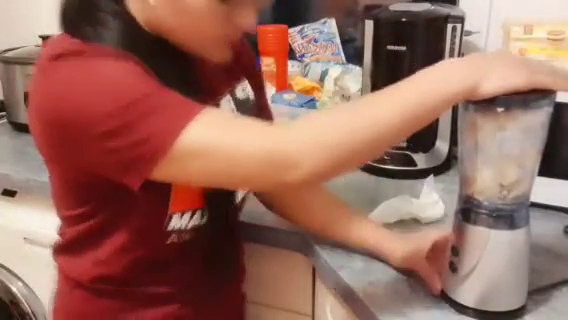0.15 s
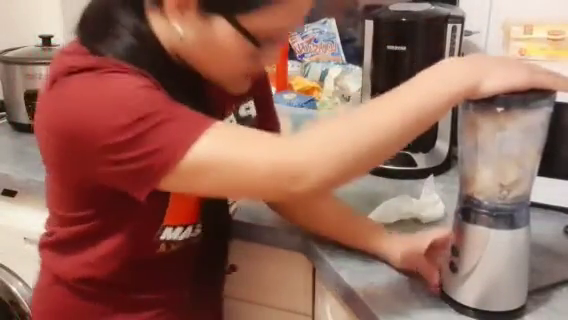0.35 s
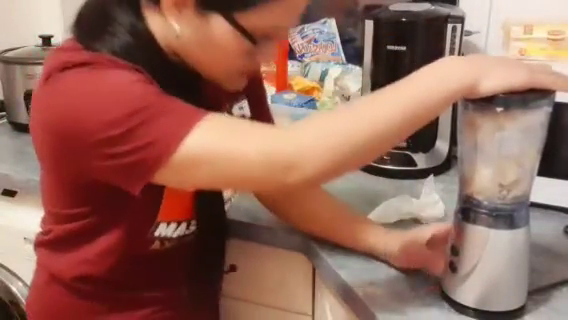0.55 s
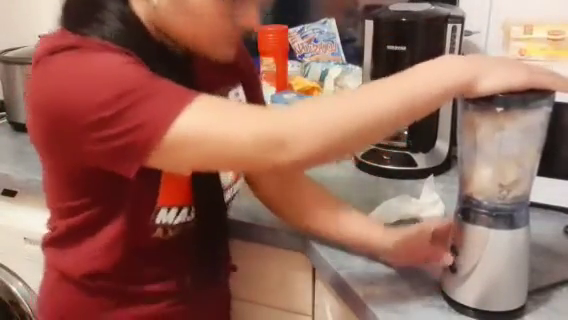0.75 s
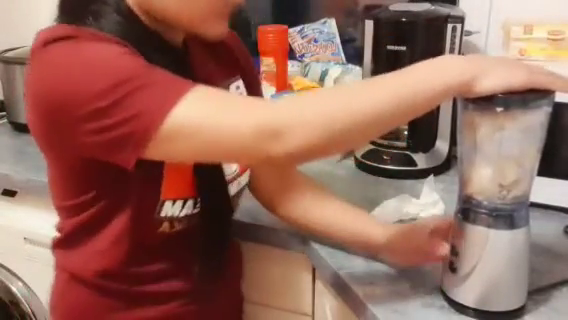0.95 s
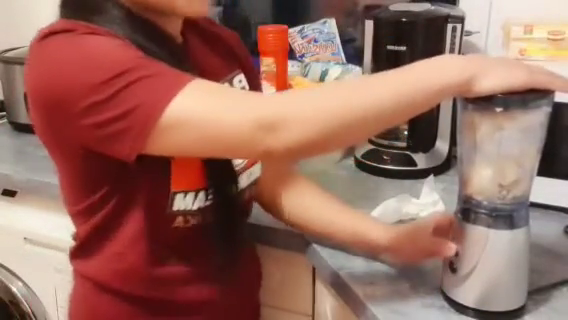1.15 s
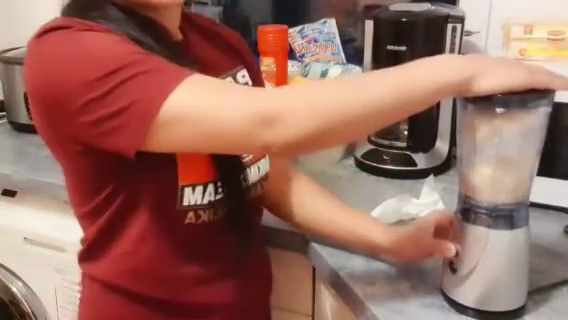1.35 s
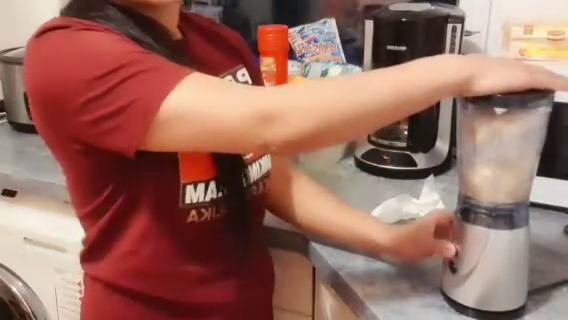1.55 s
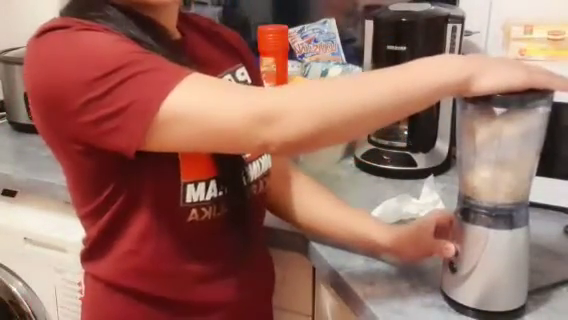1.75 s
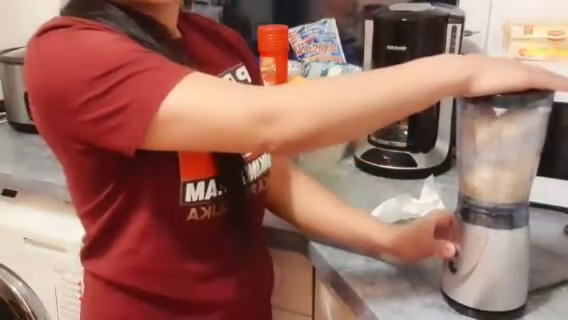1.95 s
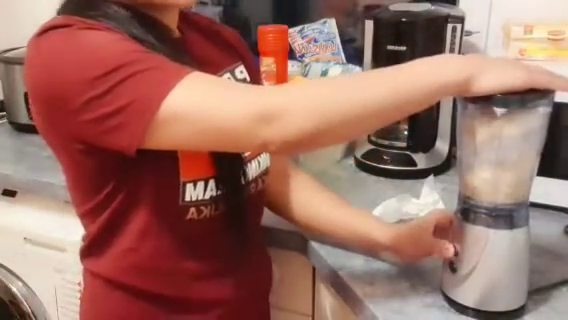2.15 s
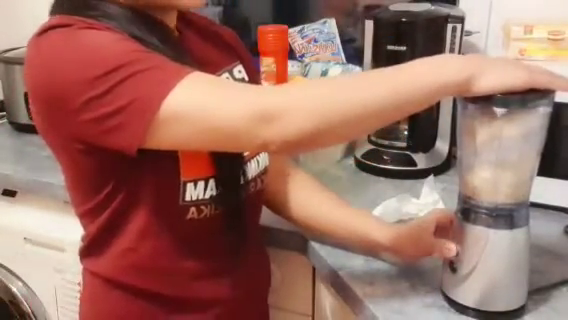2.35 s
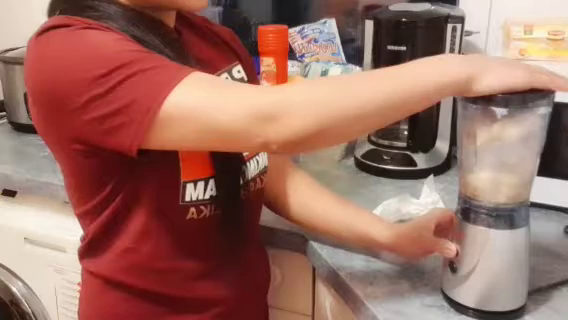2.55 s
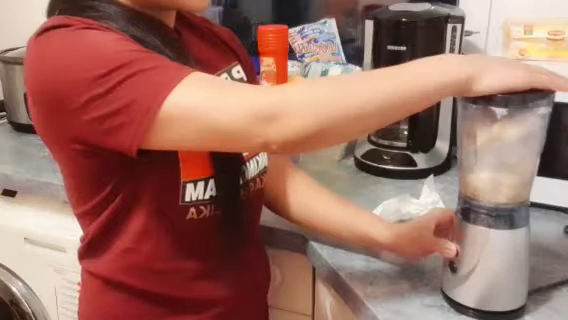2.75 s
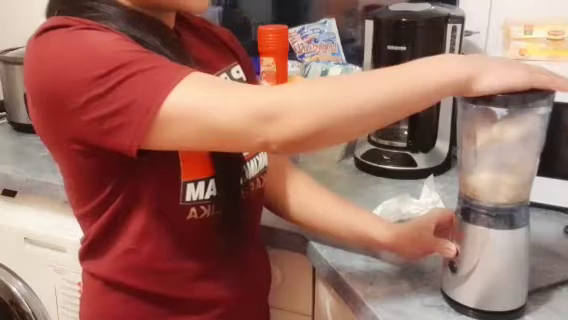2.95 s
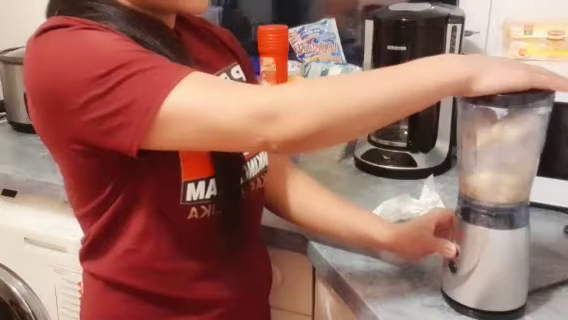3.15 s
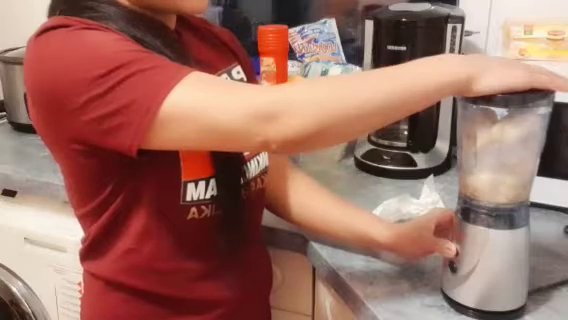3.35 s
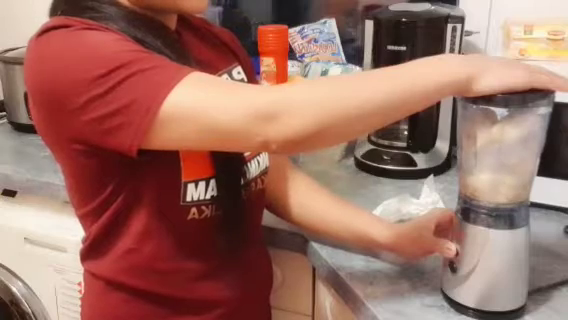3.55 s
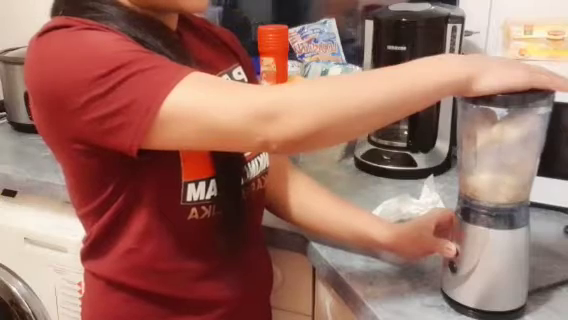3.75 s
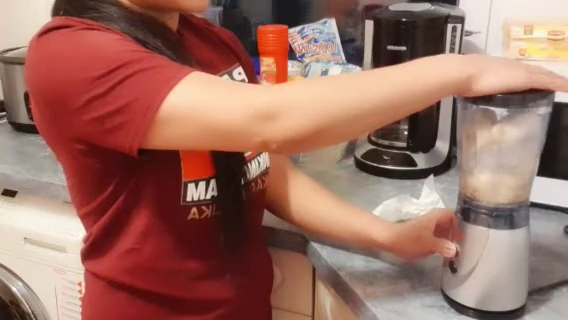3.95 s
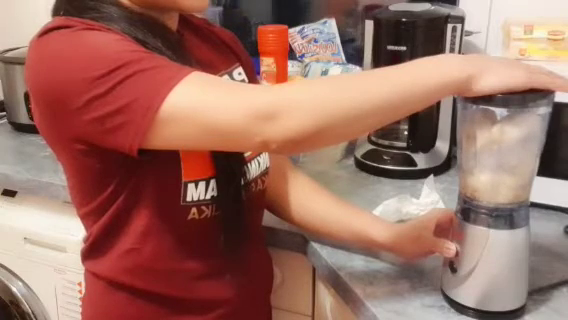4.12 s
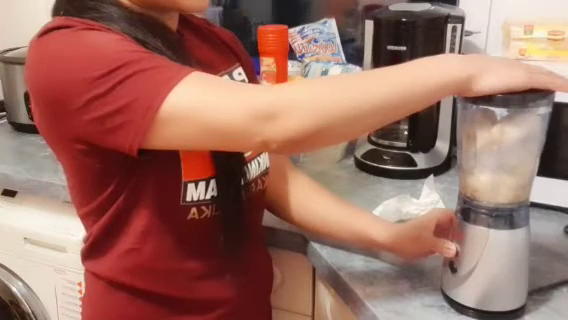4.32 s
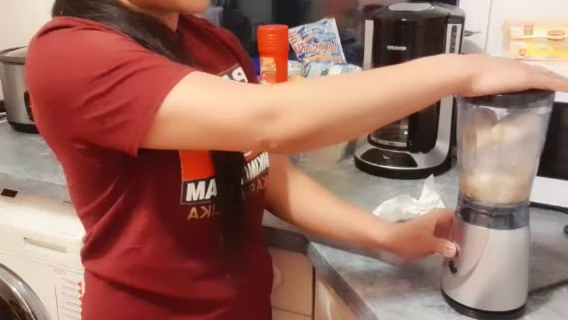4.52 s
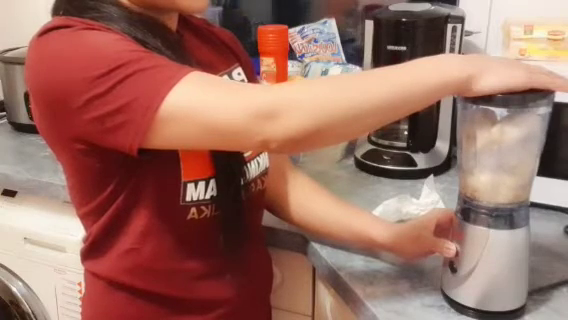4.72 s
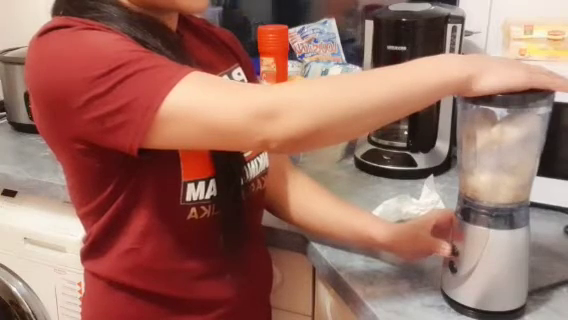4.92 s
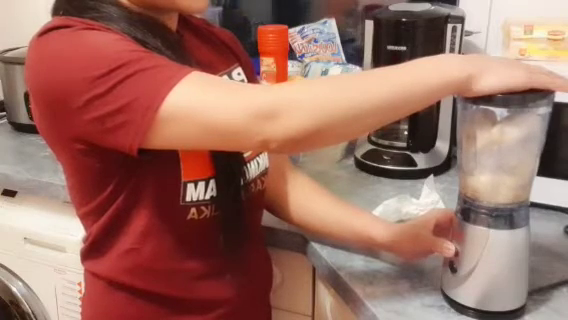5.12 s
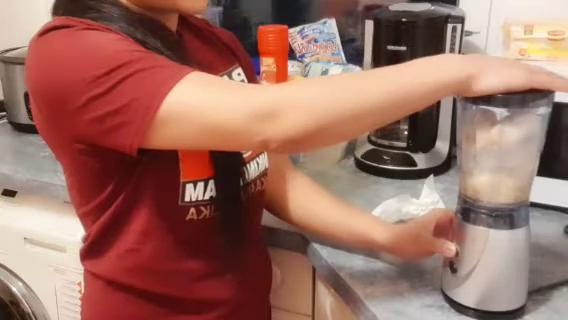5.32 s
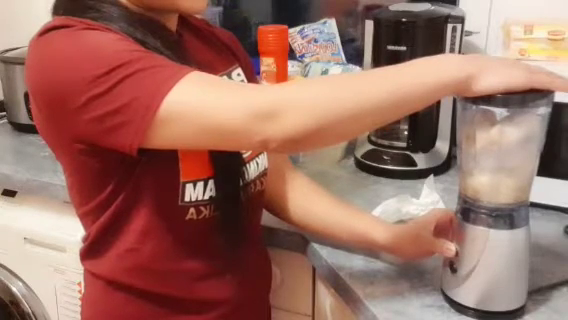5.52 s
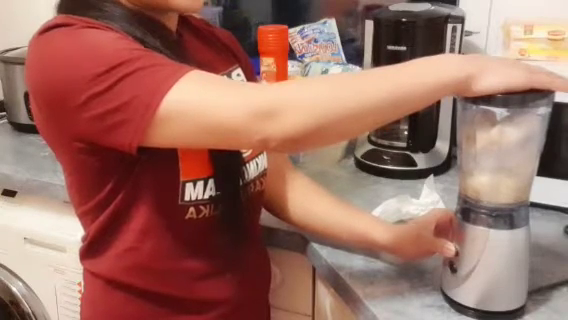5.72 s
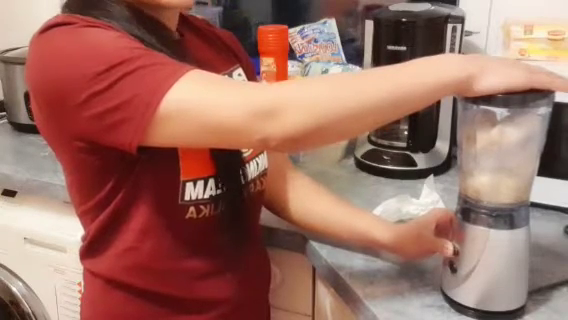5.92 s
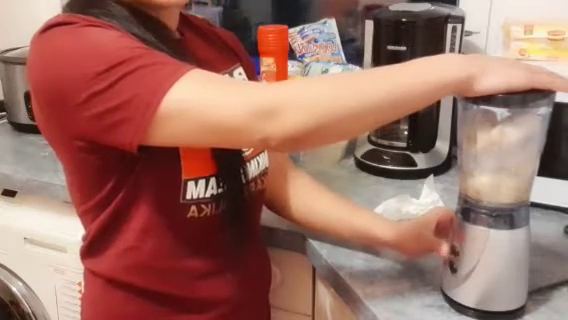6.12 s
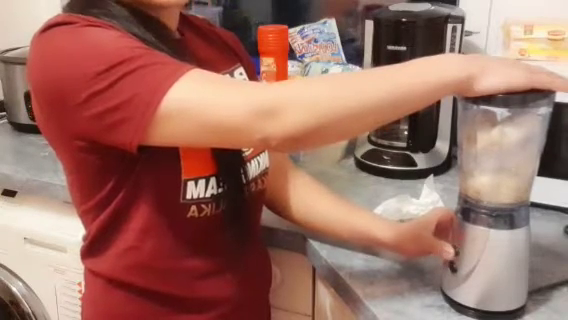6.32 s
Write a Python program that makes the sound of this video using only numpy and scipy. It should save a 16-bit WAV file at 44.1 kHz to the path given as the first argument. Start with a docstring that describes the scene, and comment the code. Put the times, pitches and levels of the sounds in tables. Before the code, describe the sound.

Quiet kitchen with a faint, low wavering hum and barely audible rubs of fingers on a plastic switch. Then a blender crushes ice close by: a short, clattering first pulse, a short gap, a long harsh run with rising motor hum and irregular cracks, then almost at once a brief third pulse. Each coasts down quickly and duller. Small hard room, short dense reverberation, single close microphone, same in both channels.

```python
"""A low wavering hum stands in a quiet kitchen; faint rubs follow, then a blender is pulsed three times.
The rattle is random contacts of ice, coloured as cracks and splinters, shaped by fixed resonances.
Big lumps shatter in short bursts; the unbalanced rotor adds sines at multiples of its turning speed.
The small hard room answers the ice with a dense tail of decaying noise."""
import sys
import numpy as np
from scipy import signal
from scipy.fft import rfft, irfft
from scipy.io import wavfile

SR = 44100
rng = np.random.default_rng(int(sys.argv[2]) if len(sys.argv) > 2 else 0)


def put_to_file(sound):
    """Save the sound as 16-bit audio at rate SR, in the file named by the first command-line argument."""
    columns = np.atleast_2d(sound).T  # one column per channel
    safe = np.clip(columns, -1, 1)
    whole_steps = np.round(safe * 32767)
    wavfile.write(sys.argv[1], SR, whole_steps.astype(np.int16))


N = 281358

# Relative spectral density of ice cracks: pitch_hz [Hz], density_db [dB per Hz]
CRACK_SPECTRUM = [(60, -23.5), (150, -13), (300, -12.5), (600, -6.5), (900, -8.5), (1200, -1.5), (1600, -5),
                  (2300, -2.5), (3100, -6), (5000, -8.5), (9000, -17.5), (16000, -21)]
# Relative spectral density of bright splinters: pitch_hz [Hz], density_db [dB per Hz]
SPLINTER_SPECTRUM = [(1760, -21.5), (3000, -30.5), (3500, -10.5), (3850, 2), (4650, 0.5), (5270, -5),
                     (8050, -2), (8940, -8), (13900, -7), (15800, -18)]
HOLLOW_HZ, HOLLOW_WIDTH_HZ = 1216.6, 71   # loose ice knocks the jug wall
# Whir and counter levels are over the rattle, at a speed of COUNTER_HZ turns per s; widths are per pass.
COUNTER_HZ, COUNTER_DB, COUNTER_DB_PER_OCTAVE = 92, -16.5, -11.5   # booms most while the rotor is slow
BOOM_LAG_S = 0.058   # the counter takes up the shaking a little late
WHIR_HZ, WHIR_WIDTH_HZ, WHIR_DB, WHIR_DB_PER_OCTAVE = 2220, 720, -16.5, 9.5


def ice():
    """Superposition of random impacts: rattle, splinters, hollow wall ring, swept whir and counter boom."""
    gate, rattle_db, splinter_db, hollow_db = rattle_levels()
    octaves = np.log2(rotor_speed()[1] / COUNTER_HZ)
    blows = contacts(6000, spread_db=2.5, clump_db=1.0)
    cracks = coloured(blows, CRACK_SPECTRUM)
    shards = contacts(9500, spread_db=2.0, clump_db=2.5)
    splinters = from_db(splinter_db) * coloured(shards, SPLINTER_SPECTRUM)
    knocks = contacts(900, spread_db=0.5, clump_db=2.5)
    hollow = from_db(hollow_db) * rms_one(resonance(knocks, HOLLOW_HZ, HOLLOW_WIDTH_HZ))

    # crushed ice swept round by the blades, growing with speed
    swept = resonance(rng.standard_normal(N), WHIR_HZ, WHIR_WIDTH_HZ)
    swept = rms_one(resonance(swept, WHIR_HZ, WHIR_WIDTH_HZ))
    whir = from_db(WHIR_DB + WHIR_DB_PER_OCTAVE * octaves + 2.2 * drift(10.6)) * swept

    boom = rms_one(resonance(resonance(blows, COUNTER_HZ, 70), COUNTER_HZ, 64))
    boom_db = COUNTER_DB + COUNTER_DB_PER_OCTAVE * octaves + 4.0 * drift(10)
    taken_up = np.clip(pulses()[1] / BOOM_LAG_S, 0, 1) ** 2
    counter = taken_up * from_db(boom_db) * boom
    return gate * from_db(rattle_db) * (cracks + splinters + hollow + whir + counter)


COAST_POWER = 2.3   # the rattle sinks ever faster while the blades coast
COAST_DULL_DB = 14   # splinters thin out while coasting
JOLT_DB, JOLT_S = 3.5, 0.045   # the starting blades splinter the ice that lies on them
WHOLE_ICE_DB, WHOLE_ICE_S = 4.5, 0.43   # whole cubes splinter brightly in the first pulse, until broken
LOOSE_KNOCK_DB, LOOSE_S = 4, 0.12   # loose ice knocks the wall most just after a start
SURGE_DB, SURGE_HZ, KNOCK_SURGE_DB, KNOCK_SURGE_HZ = .8, 12, 2, 8.7   # the load comes and goes


def rattle_levels():
    """Excitation follows the rotor: gate and levels of rattle, splinters and hollow ring at every sample."""
    gate, since, coasted, which = pulses()
    rattle_db, splinter_db, hollow_db, loss_db = np.transpose(PULSES)[4:8, which]
    rattle_db = rattle_db - loss_db * coasted ** COAST_POWER + SURGE_DB * drift(SURGE_HZ)
    jolt_db = JOLT_DB * np.exp(-since / JOLT_S)
    whole_db = (which == 0) * WHOLE_ICE_DB * np.exp(-since / WHOLE_ICE_S)
    splinter_db = splinter_db + jolt_db + whole_db - COAST_DULL_DB * coasted
    loose_db = LOOSE_KNOCK_DB * np.exp(-since / LOOSE_S)
    hollow_db = hollow_db + loose_db + KNOCK_SURGE_DB * drift(KNOCK_SURGE_HZ)
    return gate, rattle_db, splinter_db, hollow_db


# Pulses of the blender: switch_on_s [s], switch_off_s [s], rest_s [s], rise_s [s],
# rattle_db [dB before the resonances], splinter_db [dB over rattle], hollow_db [dB over rattle],
# coast_loss_db [dB lost by rest], unbalance_db [dB before the base]
PULSES = [(1.259, 1.492, 1.865, 0.035, -23.5, -7, -6.5, 11.5, -42),
          (2.297, 4.92, 5.192, 0.013, -25.5, -8.5, -9.5, 16, -40),
          (5.26, 5.916, 6.229, 0.0094, -25.5, -13, -15.5, 18.5, -38.5)]
SETTLE_S = 0.018   # closing fade just before the blades rest


def pulses():
    """Run-up and coast-down: gate, time since switch-on, share of the coast-down done, pulse number."""
    t = np.arange(N) / SR
    on, off, rest, rise = np.transpose(PULSES)[:4]
    which = np.clip(np.searchsorted(on, t) - 1, 0, None)
    since = t - on[which]
    gate = np.clip(np.minimum(since / rise[which], (rest[which] - t) / SETTLE_S), 0, 1)
    coasted = np.clip((t - off[which]) / (rest - off)[which], 0, 1)
    return gate, np.maximum(since, 0), coasted, which


# Big lumps struck by a blade: start_s [s], peak_db [nominal dB before the resonances],
# splinter_db [dB over cracks]
LUMPS = [(1.2845, -19, 7), (1.318, -3.5, 0), (1.331, -10, -1.5), (1.3713, -4.5, 1.5), (1.3894, -9.5, -1),
         (1.45, -11, -1), (1.488, -3.5, -2.5), (1.656, -7.5, -6), (1.737, -10, -7), (1.8215, -11.5, -5),
         (2.389, -9, -0.5), (2.79, -9, -4), (2.828, -4, -13), (2.9498, -11, -3.5), (3.24, -13, 2),
         (3.441, -10, -3), (3.9494, -15, -1), (4.35, -21, -3), (4.409, -6, -1.5), (4.8053, -13, -5),
         (4.8824, -16.5, 9), (4.925, -9.5, 1), (4.9494, -11, -4), (5.0524, -14, -7), (5.288, -16, -7),
         (5.457, -7.5, -8), (5.479, -5.5, -6.5), (5.65, -11, -4), (5.716, -6, 0), (5.8087, -14.5, 1),
         (5.911, -7, -2.5), (6.034, -20, 3.5)]
SHARD_CREST_DB = 13.5   # nominal peaks of a shattering lump over its rms
SHATTER_RISE_S, LUMP_T60_S = 0.0037, 0.12
LUMP_KNOCK_DB = -12.5   # each lump also knocks the wall


def lumps():
    """Brittle fracture: each struck lump is a burst of cracks that swells quickly and dies exponentially."""
    t, burst, bright = np.arange(N) / SR, np.zeros(N), np.zeros(N)
    for start_s, peak_db, splinter_db in LUMPS:
        rise = np.clip((t - start_s) / SHATTER_RISE_S, 0, 1)
        decay_db = 60 * np.clip(t - start_s, 0, 1) / LUMP_T60_S
        shape = rise * from_db(peak_db - SHARD_CREST_DB - decay_db)
        burst += shape
        bright += from_db(splinter_db) * shape
    shards = contacts(8000, spread_db=1.0, clump_db=1.5)
    wall = rms_one(resonance(burst * shards, HOLLOW_HZ, HOLLOW_WIDTH_HZ))
    knock = from_db(LUMP_KNOCK_DB) * wall * np.std(burst)
    return burst * coloured(shards, CRACK_SPECTRUM) + bright * coloured(shards, SPLINTER_SPECTRUM) + knock


# Fixed resonances of the rattle, from jug, base and room:
# pitch_hz [Hz], width_hz [Hz], lift_db [dB, of this resonance alone]
RESONANCES = [(456, 23, 5), (560, 32, 1.5), (796, 24, 9), (1090, 28, 2), (1170, 26, -4.5), (1449, 53, 5),
              (1688, 40, 4.5), (1790, 49, 2.5), (1994, 14, 3.5), (2156, 15, 7.5), (2295, 44, -1.5),
              (2447, 110, -1.5), (2597, 160, 1.5), (3480, 99, 5.5), (4084, 20, -5), (4446, 91, -6),
              (4463, 110, 6), (5670, 300, 1.5), (6270, 110, 2.5), (6960, 120, 2), (8270, 92, 1)]


def fixed_resonances(x):
    """Resonance: fixed resonances lift or weaken narrow bands of the rattle."""
    for pitch_hz, width_hz, lift_db in RESONANCES:
        x = x + (from_db(lift_db) - 1) * resonance(x, pitch_hz, width_hz)
    return x


# Rotor speed, one table per pulse: time_s [s], speed [turns per s]
SPEED = [
    [(1.45, 88), (1.648, 127), (1.75, 116)],
    [(2.35, 82), (2.56, 171), (2.73, 180), (2.83, 195), (2.88, 185), (3.0, 180), (3.19, 197), (3.43, 198),
     (3.58, 194), (3.73, 200), (3.93, 207.5), (4.05, 200), (4.19, 211), (4.83, 215), (4.88, 204),
     (5.05, 103)],
    [(5.28, 79), (5.39, 112), (5.452, 150), (5.6, 161), (5.758, 174), (5.94, 175), (6.05, 97)],
]


def rotor_speed():
    """Angular motion: a gate open while each speed table lasts, and the turns per second."""
    return in_time(SPEED, .04)


# How the base passes the unbalance on: pitch_hz [Hz], gain_db [dB]
BASE_PASSES = [(85, -1), (105, -1), (130, -7), (158, -11), (166, -2), (190, -2), (215, 1)]
# Higher orders: multiple of the speed [1], level_db [dB rms at top speed, before wavering]
WHINE = [(6, -45), (7, -42.5), (8, -43.5), (11, -47), (12, -48.5)]
TOP_SPEED, WHINE_DB_PER_OCTAVE = 210.6, 61   # turns per s; the whine grows steeply towards it
SECOND_DB, BASE_HZ, BASE_WIDTH_HZ = -41, 418, 80   # the second order shows where it meets a base mode


def rotor():
    """Rotating unbalance: forces once and twice a turn waver with the load; a thin whine joins at speed."""
    gate, speed = rotor_speed()
    turn = 2 * np.pi * np.cumsum(speed * (1 + .004 * drift(20))) / SR
    first_db = np.transpose(PULSES)[8, pulses()[3]] + at_hz(BASE_PASSES, speed)
    stumble_db = 0.6 + 6.1 * np.clip(1 - speed / 165, 0, 1)   # a slow rotor is jolted by the ice
    first = from_db(first_db + stumble_db * drift(18)) * np.sin(turn)
    detuning = 2 * (2 * speed - BASE_HZ) / BASE_WIDTH_HZ
    second_db = SECOND_DB - 20 * np.log10(1 + detuning ** 2)
    second = from_db(second_db + 1.0 * drift(8.2)) * np.sin(2 * turn)
    whine = sum(from_db(db + 1.7 * drift(6)) * np.sin(round(order) * turn) for order, db in WHINE)
    whine = whine * from_db(WHINE_DB_PER_OCTAVE * np.log2(speed / TOP_SPEED))
    return np.sqrt(2) * gate * (first + second + whine)


# Fingers on the switch: start_s [s], level_db [dB rms before the swell],
# pitch_hz [Hz], width_hz [Hz per pass], length_s [s]
HANDLING = [(.86, -92, 1500, 150, .05), (0.917, -85, 794, 150, .06), (.94, -87, 1550, 200, .07),
            (1.04, -85, 2280, 500, .05), (1.153, -76, 1530, 154, 0.29), (2.273, -77.5, 700, 200, 0.02)]


def handling():
    """Friction noise: faint rubs and a creak of plastic, each resonant noise under a half-sine swell."""
    t, out = np.arange(N) / SR, np.zeros(N)
    for start_s, level_db, pitch_hz, width_hz, length_s in HANDLING:
        rub = resonance(rng.standard_normal(N), pitch_hz, width_hz)
        rub = rms_one(resonance(rub, pitch_hz, width_hz))
        swell = np.sin(np.pi * np.clip((t - start_s) / length_s, 0, 1))
        out += from_db(level_db) * rub * swell
    return out


KITCHEN_DB = -4   # reverberation against direct sound


def kitchen(x, count=5):
    """Diffuse reverberation: flying ice is shared among spots that reach the room differently."""
    shares = np.array([drift(10.2) for _ in range(count)])
    shares /= np.sqrt(np.sum(shares ** 2, axis=0))
    wet = sum(signal.fftconvolve(share * x, room_tail())[:N] for share in shares)
    return (x + from_db(KITCHEN_DB) * wet) / np.sqrt(1 + from_db(2 * KITCHEN_DB))


# Reverberation time of the kitchen: pitch_hz [Hz], t60_s [s]
KITCHEN_T60 = [(60, .4), (300, .36), (1200, .36), (6000, .32), (11000, .28), (16000, .23)]


def room_tail():
    """Exponential decay of a diffuse field: dense noise that dies octave by octave; energy 1."""
    t, tail = np.arange(SR // 2) / SR, 0
    edges_hz = 40 * 2 ** np.arange(0, 9.1)
    for low, high in zip(edges_hz, edges_hz[1:]):
        octave = signal.butter(2, [low, high], "band", fs=SR, output="sos")
        band = signal.sosfilt(octave, rng.standard_normal(SR // 2))
        t60_s = at_hz(KITCHEN_T60, np.sqrt(low * high))
        tail = tail + band * from_db(-60 * t / t60_s) / np.sqrt(t60_s)
    tail *= t > .003   # the path by the first wall is about a metre longer
    return tail / np.sqrt(np.sum(tail ** 2))


# The wavering hum: time_s [s], level_db [dB rms of the fundamental, before drift]
HUM_LEVEL = [(0, -56), (.2, -63), (.7, -57), (1.25, -60.5), (2.1, -60), (4, -60), (6.38, -57)]
HUM_HZ, HUM_OCTAVE_DB = 48.5, -19   # the octave is relative to the fundamental
# Relative spectral density of room tone: pitch_hz [Hz], density_db [dB per Hz]
QUIET_SPECTRUM = [(25, -36), (50, -10), (70, -20), (100, -17), (160, -28), (300, -36), (450, -46),
                  (900, -49), (3000, -53), (9000, -60), (13000, -55), (16000, -58)]
QUIET_DB = -70.5   # rms


def quiet_kitchen():
    """Harmonic hum over stationary noise: a wavering tone with its octave, and faint room tone."""
    level_db = in_time([HUM_LEVEL], .01)[1]
    turn = 2 * np.pi * HUM_HZ * np.arange(N) / SR
    octave = from_db(HUM_OCTAVE_DB + 2.8 * drift(8)) * np.sin(2 * turn)
    hum = np.sqrt(2) * from_db(level_db + .8 * drift(6)) * (np.sin(turn) + octave)
    return hum + from_db(QUIET_DB) * coloured(rng.standard_normal(N), QUIET_SPECTRUM)


def contacts(per_s, spread_db, clump_db):
    """Random impact process: clicks of uneven size and either sign that come in clumps; rms 1."""
    sizes = from_db(spread_db * np.minimum(rng.exponential(1, N), 5)) * rng.choice([-1, 1], N)
    struck = rng.random(N) < per_s / SR
    return rms_one(sizes * struck * from_db(clump_db * drift(32)))


def drift(hz):
    """Low-passed chance: a slow random fluctuation of spread 1."""
    low_pass = signal.butter(2, hz, fs=SR, output="sos")
    return rms_one(signal.sosfilt(low_pass, rng.standard_normal(N + SR))[SR:])   # skip the settling


def resonance(x, hz, width_hz):
    """Damped oscillator: a two-pole resonance, gain 1 on top."""
    r = np.exp(-np.pi * width_hz / SR)
    zeros = np.array([1, 0, -1]) * (1 - r * r) / 2
    poles = [1, -2 * r * np.cos(2 * np.pi * hz / SR), r * r]
    return signal.lfilter(zeros, poles, x)


def coloured(x, spectrum):
    """Causality: a minimum-phase filter with the given spectrum, so that nothing sounds early; rms 1."""
    log_gain = np.log(from_db(at_hz(spectrum, np.linspace(0, SR / 2, 4097))))
    cepstrum = irfft(log_gain)
    cepstrum[1:4096] *= 2   # fold the cepstrum onto positive time
    cepstrum[4097:] = 0
    response = irfft(np.exp(rfft(cepstrum)))
    return rms_one(signal.fftconvolve(x, response)[:N])


def at_hz(points, hz):
    """Logarithmic pitch scale: read a table on a log-frequency axis."""
    points = np.array(points)
    return np.interp(np.log(hz + 1), np.log(points[:, 0]), points[:, 1])


def in_time(tables, fade_s):
    """Linear interpolation: a gate open within each table, then the table columns at every sample."""
    t, gate = np.arange(N) / SR, np.zeros(N)
    for rows in tables:
        gate += np.clip(np.minimum(t - rows[0][0], rows[-1][0] - t) / fade_s, 0, 1)
    time_s, *columns = np.concatenate(tables).T
    return [gate] + [np.interp(t, time_s, column) for column in columns]


def rms_one(x):
    """Mean power: scale to rms 1."""
    return x / np.sqrt(np.mean(x ** 2) + 1e-20)


def from_db(db):
    """Logarithmic level scale: dB to amplitude gain."""
    return 10 ** (np.asarray(db) / 20)


def scene():
    """Superposition at one microphone: ice in the room, rotor, handling and quiet; both channels alike."""
    ice_in_room = kitchen(fixed_resonances(ice() + lumps()))
    heard = ice_in_room + rotor() + handling() + quiet_kitchen()
    return np.array([heard, heard])


CUTOFF_HZ = 15800


def record(dry):
    """Band limiting: the microphone droops at the top, then the top is cut steeply."""
    dry = signal.sosfilt(signal.butter(2, 17000, fs=SR, output="sos"), dry)
    return signal.sosfilt(signal.ellip(12, .3, 65, CUTOFF_HZ, fs=SR, output="sos"), dry)


dry = scene()
out = record(dry)
put_to_file(out)
```